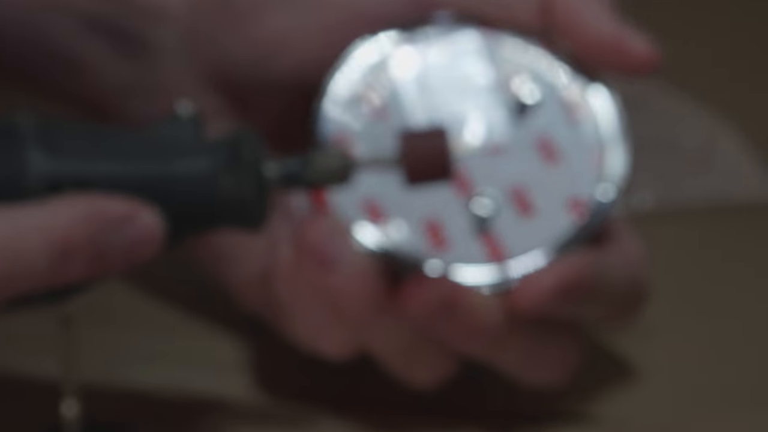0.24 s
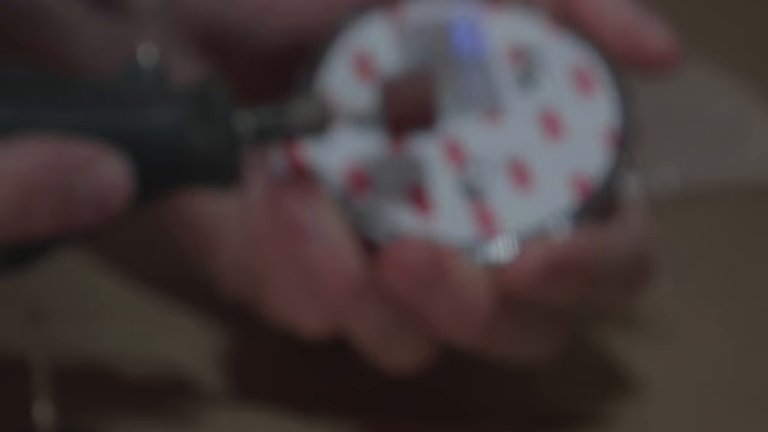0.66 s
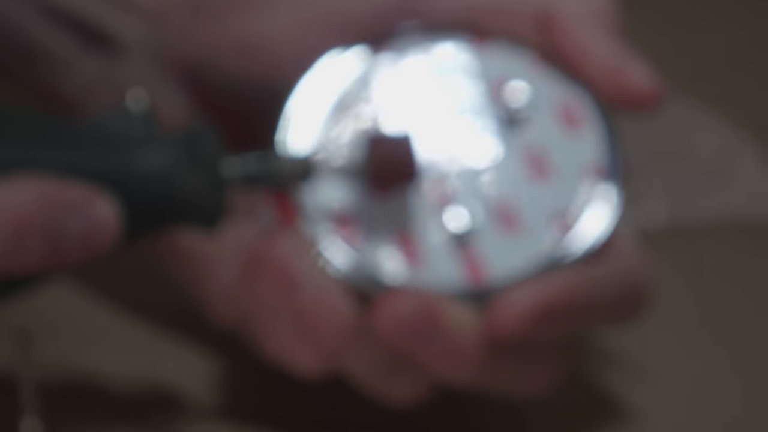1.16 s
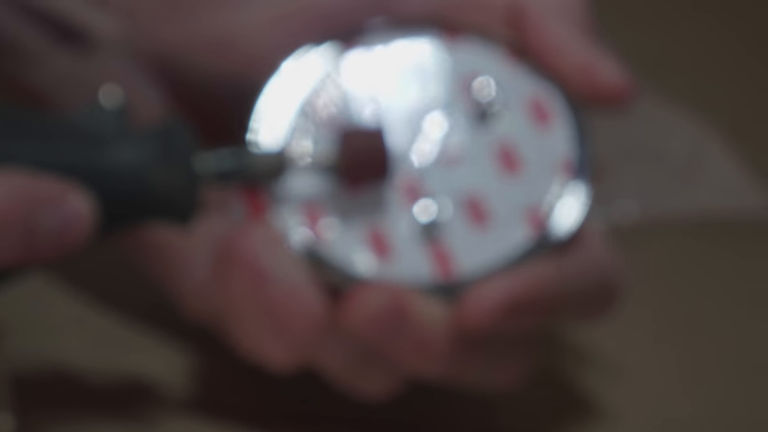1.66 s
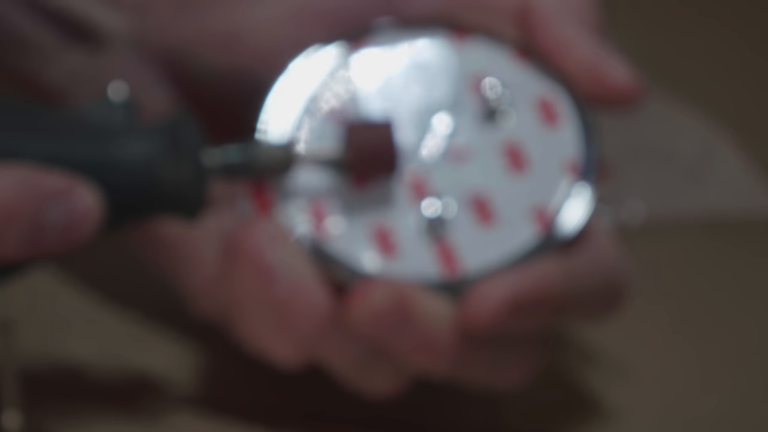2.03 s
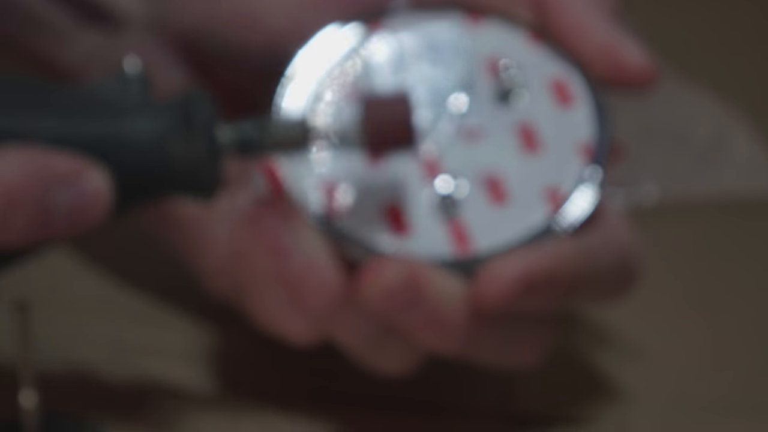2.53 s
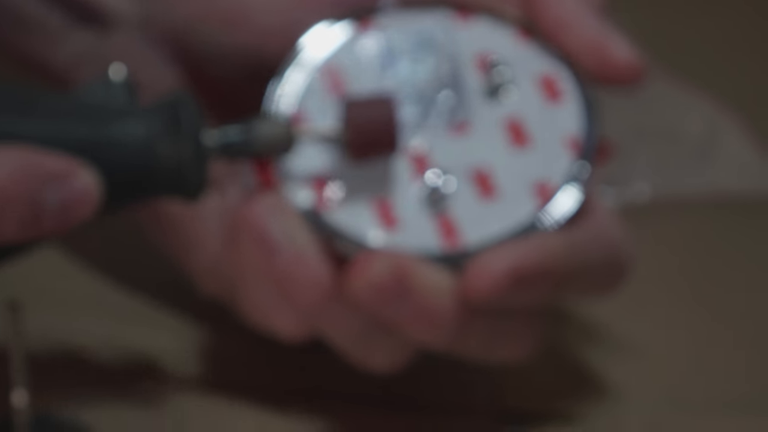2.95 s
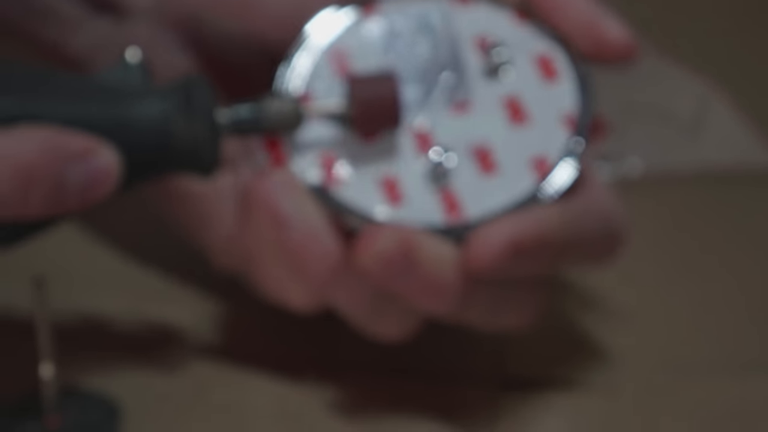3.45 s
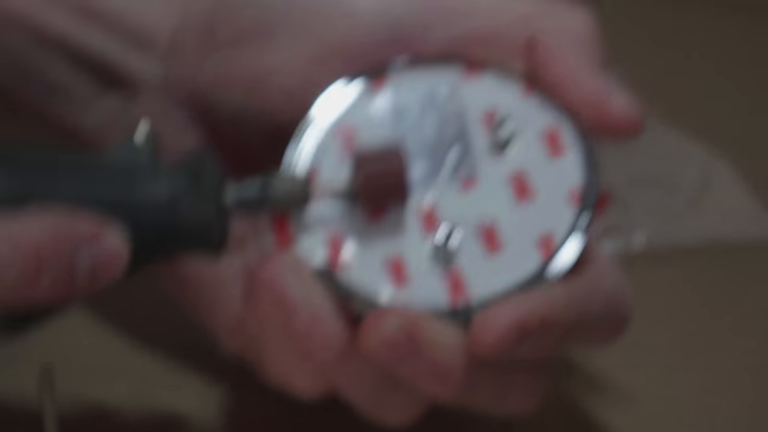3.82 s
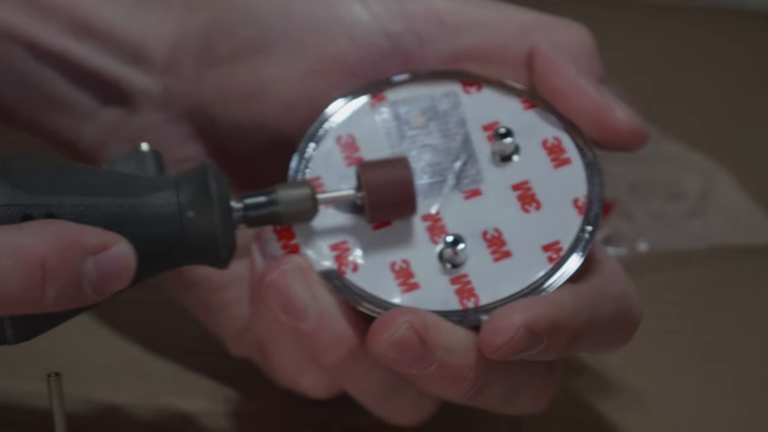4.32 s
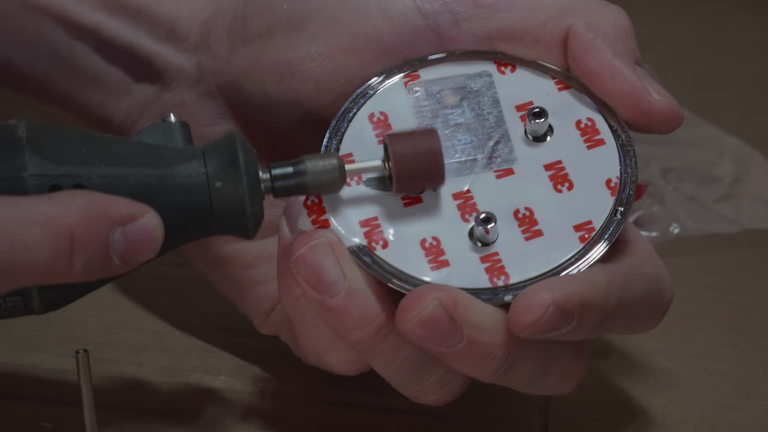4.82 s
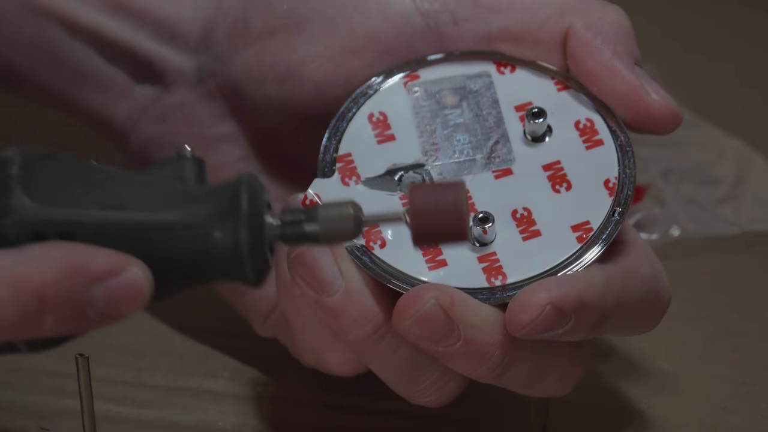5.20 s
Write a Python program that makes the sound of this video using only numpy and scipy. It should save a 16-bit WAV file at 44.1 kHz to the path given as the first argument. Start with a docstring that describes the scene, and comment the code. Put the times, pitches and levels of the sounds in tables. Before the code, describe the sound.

Steady electric motor whine, dense and buzzing, dominates from start to finish with no pause. The speed sags in the first two seconds, then wavers lower. A sanding drum touches a plastic disc in brief irregular scratches and high chirps, with faint soft hand knocks beneath. Near the end one sharper squeal is followed by rapid buzzing chatter as the speed recovers slightly. Close microphone, centred, little room sound.

```python
"""Rotary tool sanding a plastic disc, close up

A small mains-powered rotary tool whines close to the microphone: a sum of shaft orders that follow one speed curve.
Its speed control chops the mains, which hangs side tones on every order; the brushes and vent air are shaped noise.
The sanding drum grazes the disc: noise that repeats each turn makes the rasp, and shaft orders make short squeals.
At the end the drum chatters against the disc. A few decaying low tones are soft knocks of the hands and the disc."""
import sys
import numpy as np
from scipy import signal
from scipy.fft import rfft, irfft
from scipy.io import wavfile
from scipy.ndimage import uniform_filter1d

SR = 44100
rng = np.random.default_rng(int(sys.argv[2]) if len(sys.argv) > 2 else 0)


def persist_wave(psi):
    """Save psi, clipped to +-1, as 16-bit WAV."""
    counts = np.round(np.clip(psi, -1, 1) * 32767).astype(np.int16)
    wavfile.write(sys.argv[1], SR, np.atleast_2d(counts).T)


N = 241094
TIME = np.arange(N) / SR  # seconds
MAINS_PULSE_HZ = 119.9

# How hard each shaft order shakes the housing, before its resonances.
# Each row: order number, level in dB at the working speed, growth in dB per Hz of shaft speed.
SHAFT_ORDERS = [(1, -25, 0.06), (2, -47, 0.2766), (3, -28.3, 0.13), (4, -33.5, 0.1424), (5, -35.5, 0.085),
                (6, -38.5, 0.1732), (7, -30.4, .03), (8, -34, 0.0679), (9, -30.5, 0.0327),
                (10, -31.5, 0.14), (11, -31, -0.02), (12, -34.5, -0.0574), (13, -39.5, 0.12),
                (14, -40.5, 0.154), (15, -39.5, .22), (16, -33, 0.2181), (17, -32, 0.0768),
                (18, -35, 0.1524), (19, -35.5, 0.13), (20, -37.5, 0.1337)]
# Whine of armature and bearings, added to orders 5 and up. Each row: time in seconds, level in dB.
WHINE_LEVEL = [(.22, .5), (.31, -3), (.5, 0), (.68, 3), (1.6, 2), (1.95, 0.63), (3.5, 0.4), (4.0, -2.5),
               (5.15, -1.5)]
# Resonances of the housing, through which the orders slide. Each row: centre in Hz, width in Hz, level in dB.
HOUSING_MODES = [(737, 114, 13), (1135, 183, 4), (1319, 183, 2), (1577, 140, -4), (1852, 250, -0.5),
                 (2216, 400, -7), (2486, 300, -5.5), (3182, 263, 0), (3505, 150, -6), (3820, 260, -8),
                 (4154, 330, 3), (4560, 664, 5.5), (5240, 78, -6.5), (6100, 166, -12)]
BETWEEN_RESONANCES_DB = -12.5
WORKING_HZ = 330  # turns per second
# Pressing into the chatter steadies the shaft (order 1) and makes the disc sing at order 4.
PRESS_FROM_S, PRESS_RISE_S, STEADIED_DB, SINGING_DB = 5.2, 0.15, -6.5, 9.5


def motor(turns, speed):
    """Clean low orders and a rougher whine of higher ones; each swells as it slides through a housing resonance."""
    press = np.clip((TIME - PRESS_FROM_S) / PRESS_RISE_S, 0, 1)
    pressed_db = {1: STEADIED_DB, 4: SINGING_DB}
    whine_gain = amp(curve(WHINE_LEVEL))
    out = np.zeros(N)
    for order, db, growth in SHAFT_ORDERS:
        housing = np.sqrt(response(HOUSING_MODES, order * speed) + amp(BETWEEN_RESONANCES_DB) ** 2)
        if order <= 4:
            press_gain = amp(press * pressed_db.get(order, 0))
            tone = press_gain * shaft_tone(order, turns, speed, wander_db=0.7, blur=0.032)
        else:
            tone = whine_gain * shaft_tone(order, turns, speed, wander_db=1.41, blur=0.21)
        level = amp(db + growth * (speed - WORKING_HZ))
        out += level * housing * tone
    return out


# Strength of the nearest side tones beside an order, by their own pitch.
# Each row: pitch of the side tone in Hz, level in dB relative to its order.
SIDE_TONE_LEVEL = [(200, -32.5), (262, -18.5), (400, -26.5), (520, -24.5), (660, -28.5), (830, -16.5),
                   (950, -23.5), (1060, -23), (1190, -12), (1330, -22), (1900, -10), (3200, -10),
                   (4500, -9), (7000, -10.5)]


def shaft_tone(order, turns, speed, wander_db, blur):
    """One shaft order with the side tones of the chopped mains; level and phase (blur in radians) wander."""
    sides = 0
    # the second pair lies at twice the mains pulse rate, 7 dB lower on the same spectrum
    for step, db in [(1, 0), (-1, 0), (2, -7), (-2, -7)]:
        offset_hz = step * MAINS_PULSE_HZ
        depth = amp(db + read(SIDE_TONE_LEVEL, order * speed + offset_hz))
        sides = sides + depth * np.exp(2j * np.pi * (offset_hz * TIME + rng.random()))
    angle = 2 * np.pi * (order * turns + rng.random()) + blur * drift(9.9)
    wander = amp(wander_db * drift(7.3))
    return wander * np.sqrt(2) * ((1 + sides) * np.exp(1j * angle)).real


# Brushes on the commutator. Each row: time in seconds, level in dB.
BRUSH_LEVEL = [(0.0, -23.5), (0.13, -28.5), (0.44, -25.5), (0.85, -29.5), (2.2, -32.5), (3.15, -32),
               (4.0, -34), (5.15, -35), (5.33, -29), (5.46, -25.5)]
# Spectrum of the brushes, relative. Each row: frequency in Hz, level in dB per Hz.
BRUSH_SPECTRUM = [(200, -33), (2000, -12), (4300, 1), (5600, -4), (7000, 6), (8300, 6), (9800, 1.5),
                  (11500, 3), (13500, -2.5), (16000, -8)]
# How the brushes ride. Each row: time in seconds, share of the power that repeats from turn to turn.
BRUSH_SEATING = [(0, .72), (.55, .9), (1.7, .86), (3.1, .74), (3.7, .58), (5.46, .68)]
# How crisp the brushes sound. Each row: time in seconds, gain above 9 kHz in dB.
BRUSH_CRISPNESS = [(0, 0), (1.7, 1.5), (3.1, 0.5), (3.9, -3.5), (4.9, -5), (5.05, -2.5), (5.46, -5)]


def brushes(turns, swell=0.65, mains_depth=0.15, ripple_turns=0.0079):
    """Brushes scrape and spark in two swells a turn; each mains pulse nudges the shaft and strengthens both."""
    mains = 2 * np.pi * MAINS_PULSE_HZ * TIME
    nudge = ripple_turns * (np.sin(mains) + .5 * np.cos(2 * mains))
    scrape = each_turn(turns + nudge, change_hz=0.98)
    sparks = rng.standard_normal(N)
    gate = 1 - swell + swell * strokes(2 * turns, rise=0.067, fall=0.23)
    gate = gate * (1 + mains_depth * np.cos(mains))
    # the body of the sound is mostly scrape; the top holds more sparks
    seating = curve(BRUSH_SEATING)
    bands = [("lowpass", seating, 1), ("highpass", .7 * seating, amp(curve(BRUSH_CRISPNESS)))]
    out = np.zeros(N)
    for side, share, gain in bands:
        mixture = np.sqrt(share) * scrape + np.sqrt(1 - share) * sparks
        fizz = coloured(gate * mixture, BRUSH_SPECTRUM)
        band_filter = signal.butter(3, 9000, side, fs=SR, output="sos")
        out += gain * signal.sosfiltfilt(band_filter, fizz)
    return amp(curve(BRUSH_LEVEL)) * out


# The drum grazes the disc. Each row: start in seconds, end in seconds, rasp in dB, squeal in dB,
# tilt of the squeal at its onset in dB per octave. Both levels are scaled by the force of the grip.
DRUM_GRAZES = [(0.0, 0.241, -44, -32, -17), (1.867, 1.913, -30, -34.5, 2), (2.135, 2.182, -30.5, -37, 10),
               (2.26, 2.285, -35, -46, 0), (2.332, 2.419, -29, -31, 4), (2.49, 2.518, -34, -48, 0),
               (3.11, 3.151, -33, -48, 0), (3.27, 3.37, -37, -40.5, 9), (3.457, 3.612, -33, -39, 8),
               (3.624, 3.734, -37, -31.5, 4), (3.766, 3.89, -39, -34.5, 0), (3.933, 3.962, -34.5, -35, 2),
               (4.039, 4.11, -30.5, -36.5, 3), (4.129, 4.176, -38, -38, 0), (4.185, 4.263, -34.5, -40, 12),
               (4.427, 4.501, -33.5, -41, 0), (4.554, 4.599, -28, -34, 14), (4.6, 4.7, -34, -35, -7),
               (4.743, 4.829, -33, -35.5, 2), (4.836, 4.899, -29, -32, 3), (4.901, 4.997, -33, -19, -3.5)]
# Spectrum of the rasping grit, relative. Each row: frequency in Hz, level in dB per Hz.
RASP_SPECTRUM = [(300, -18), (1100, -0.5), (1800, 3), (2600, -3), (3400, -2), (4600, -2.5), (6000, -6.5),
                 (7600, -2), (9800, -5), (12000, -5), (14000, -11.5), (16000, -1)]


def sanding(turns, repeating=.8):
    """The drum runs slightly out of true, so the same patch of grit bites once a turn."""
    bite = strokes(turns, rise=0.044, fall=0.25)
    grit = levelled(each_turn(turns, change_hz=5.2) * bite)
    fresh = bite * rng.standard_normal(N)
    rasp = np.sqrt(repeating) * grit + np.sqrt(1 - repeating) * fresh
    contact = sum(amp(db) * grip(TIME, start, end) for start, end, db, _, _ in DRUM_GRAZES)
    return contact * amp(1.1 * drift(60)) * coloured(rasp, RASP_SPECTRUM)


# Bands in which the disc squeals, as they stand at the onset.
# Each row: centre in Hz, width in Hz, level in dB.
DISC_MODES = [(3900, 900, -18), (6300, 946, -3.5), (7580, 2300, 0), (8230, 610, 0.5), (9600, 2700, -5),
              (13700, 6100, -8)]
TILT_PIVOT_HZ = 8000
LOCK_IN_S = 0.1  # by now the contrast between bands, in dB, has doubled; it keeps growing at that rate


def catches(turns, speed, rough=0.28, spread=0.97, ragged_db=1.2):
    """Each graze sets the disc squealing on shaft orders; a held squeal narrows onto its strongest band."""
    out, order = np.zeros(N), np.arange(3, 52)[:, None]
    for start, end, _, db, tilt_db in DRUM_GRAZES:
        on = (TIME > start) & (TIME < end + .05)
        t, hz = TIME[on], order * speed[on]
        tilt = amp(tilt_db * np.log2(hz / TILT_PIVOT_HZ))
        narrowing = 1 + (t - start) / LOCK_IN_S
        ring = (np.sqrt(response(DISC_MODES, hz)) * tilt) ** narrowing
        ring /= np.linalg.norm(ring, axis=0)
        # the bite is drawn out over the patch of grit, so each order arrives a little earlier or later
        lag = np.cumsum(1 + spread * rng.standard_normal(order.shape), axis=0)
        flutter = rng.standard_normal((len(order), len(t), 2)) @ [1, 1j]
        flutter = evened(uniform_filter1d(flutter, size=150, axis=1))
        rotation = np.exp(1j * (2 * np.pi * order * turns[on] - lag))
        tone = (ring * (1 + rough * flutter) * rotation).sum(0).real
        out[on] += amp(db) * evened(tone) * grip(t, start, end)
    return out * amp(ragged_db * drift(40))


# Every graze bites hard, settles and lets go; BITE is the extra share of force at the start.
RISE_S, BITE, SETTLE_S, RELEASE_S = 0.0034, 0.67, .02, 0.019


def grip(t, start, end):
    """Force of one graze: a quick bite that settles, a hold and a short release."""
    age = np.maximum(t - start, 0)
    rise = 1 - np.exp(-age / RISE_S)
    settling = 1 + BITE * np.exp(-age / SETTLE_S)
    release = np.exp(-np.maximum(t - end + RELEASE_S / 2, 0) / RELEASE_S)
    return rise * settling * release


# The drum bounces on the disc. Each row: time in seconds, level in dB; silent before the first row.
CHATTER_LEVEL = [(5.2, -57), (5.27, -29), (5.33, -22.5), (5.46, -22)]
# Spectrum of the bouncing, relative. Each row: frequency in Hz, level in dB per Hz.
CHATTER_SPECTRUM = [(400, -39), (1300, -3), (2200, 4), (2900, 5.5), (3600, 4), (4800, -3.5), (6200, -1.5),
                    (8500, -10.5), (11000, -14), (16000, -30)]


def chatter(turns, loose=0.26):
    """The drum knocks on the disc once a turn, unevenly with the pulses of torque."""
    surface = each_turn(turns, change_hz=4.2) + loose * rng.standard_normal(N)
    knocks = surface * strokes(turns, rise=.05, fall=0.44)
    torque = 1 + 0.43 * np.cos(2 * np.pi * MAINS_PULSE_HZ * TIME)
    started = TIME > CHATTER_LEVEL[0][0]
    return amp(curve(CHATTER_LEVEL)) * started * coloured(knocks * torque, CHATTER_SPECTRUM)


# Soft knocks of the hands and the disc.
# Each row: start in seconds, peak of the envelope in dB, pitch in Hz, rise and decay time in seconds.
SOFT_KNOCKS = [(.20, -54, 48, .03), (.42, -58, 120, 0.014), (.64, -45, 118, .025), (2.61, -53, 48.2, 0.026),
               (3.26, -54, 46, .03), (3.91, -58, 48, .03), (4.03, -57, 48, .03), (4.908, -47, 100, 0.0029),
               (4.912, -32, 577, 0.0011), (5.25, -52, 104, .03)]


def hands():
    """Soft knocks as the grip shifts: sines that swell and die away."""
    out = np.zeros(N)
    for start, db, hz, decay_s in SOFT_KNOCKS:
        t = np.maximum(TIME - start, 0)
        envelope = t / decay_s * np.exp(1 - t / decay_s)
        out += amp(db) * envelope * np.sin(2 * np.pi * hz * t)
    return out


# Cooling air through the vents. Each row: time in seconds, level in dB.
AIR_LEVEL = [(0, -30), (.5, -32), (1, -32.5), (1.8, -34), (3, -34), (4, -32.5), (5.15, -33), (5.46, -30)]
# Spectrum of the air, relative. Each row: frequency in Hz, level in dB per Hz.
AIR_SPECTRUM = [(25, -26), (55, -18.5), (95, -7), (150, -13), (300, -17), (580, -15), (800, -7.5),
                (1170, 2.5), (1500, -7.5), (2250, -3), (2750, -5), (3800, 3.5), (6000, -3), (16000, -20.5)]


def air():
    """The fan's rush: noise shaped by the hollow housing, its level drifting slightly."""
    level = amp(curve(AIR_LEVEL) + .5 * drift(7.2))
    return level * coloured(rng.standard_normal(N), AIR_SPECTRUM)


def each_turn(turns, change_hz, count=5, size=144):
    """A rough surface that passes again at every turn and slowly changes as it wears."""
    out = np.zeros(N)
    for _ in range(count):
        surface = signal.resample(rng.standard_normal(size // 3 * 2), size * 10)
        out += drift(change_hz) * np.interp(turns % 1, np.linspace(0, 1, len(surface)), surface)
    return levelled(out)


def strokes(turns, rise, fall):
    """One swell per turn: quick rise and slower fall, both in parts of a turn; rms one."""
    part = turns % 1
    return evened((1 - np.exp(-part / rise)) * np.exp(-part / fall))


def response(modes, hz):
    """Power gain of a set of resonances at the given pitches."""
    return sum(amp(db) ** 2 / (1 + (2 * (hz - centre) / width) ** 2) ** 2 for centre, width, db in modes)


def drift(rate_hz, size=2048):
    """Slow chance, rms one before it is joined up in time."""
    hz = np.fft.rfftfreq(size, N / SR / size)
    slow = irfft(rfft(rng.standard_normal(size)) / (1 + (hz / rate_hz) ** 2))
    return np.interp(TIME, np.linspace(0, N / SR, size), evened(slow))


def coloured(x, points):
    """Filters by a spectrum; rms one."""
    gain = amp(read(points, np.fft.rfftfreq(2 * N, 1 / SR)))
    return evened(irfft(rfft(x, 2 * N) * gain)[:N])


def read(points, hz):
    """A spectrum in dB, joined by straight lines over log frequency."""
    f, db = np.transpose(points)
    return np.interp(np.log(hz + 1), np.log(f + 1), db)


def curve(rows, axis=1):
    """One column of a table, joined by straight lines in time."""
    rows = np.asarray(rows, float)
    return np.interp(TIME, rows[:, 0], rows[:, axis])


def levelled(x):
    """Divides by the running rms over 1000 samples, so the short-term level stays even."""
    return x / np.sqrt(uniform_filter1d(x ** 2, 1000) + 1e-9)


def evened(x):
    """Scales to an rms of one."""
    return x / np.sqrt(np.mean(abs(x) ** 2) + 1e-20)


def amp(db):
    """Decibels to gain."""
    return 10 ** (np.asarray(db) / 20)


# Shaft speed, which sags under load. Each row: time in seconds, turns per second in Hz.
SHAFT_SPEED = [(0.0, 389.9), (0.12, 395), (0.45, 375.6), (0.7, 364.3), (1.05, 353.9), (1.63, 341.2),
               (1.89, 332.1), (2.36, 328.1), (2.41, 325.8), (2.79, 330.7), (3.15, 332.6), (3.81, 314.8),
               (4.07, 314.5), (4.17, 312.5), (4.28, 311.6), (4.35, 314.8), (4.55, 316.3), (4.66, 313.7),
               (4.83, 314), (4.89, 312), (4.92, 308.6), (4.96, 307), (5.33, 319.4), (5.47, 323)]


def scene():
    """Everything that turns shares one shaft; one close microphone feeds both channels."""
    speed = curve(SHAFT_SPEED) * (1 + 0.00029 * drift(7.54))
    turns = np.cumsum(speed) / SR
    tool = motor(turns, speed) + brushes(turns) + air()
    work = sanding(turns) + catches(turns, speed) + chatter(turns) + hands()
    return np.array([tool + work] * 2)


EDGE_HZ = 15800  # top of the band


def record(dry):
    """The loudest peaks are rounded off below 0.39; then the band limits."""
    rounded = dry / (1 + (dry / .39) ** 8) ** (1 / 8)
    high_pass = signal.butter(2, 25, "highpass", fs=SR, output="sos")
    low_pass = signal.firwin(1023, EDGE_HZ, window=("kaiser", 9), fs=SR)
    return signal.oaconvolve(signal.sosfilt(high_pass, rounded), low_pass[None], "same", axes=1)


dry = scene()
out = record(dry)
persist_wave(out)
```